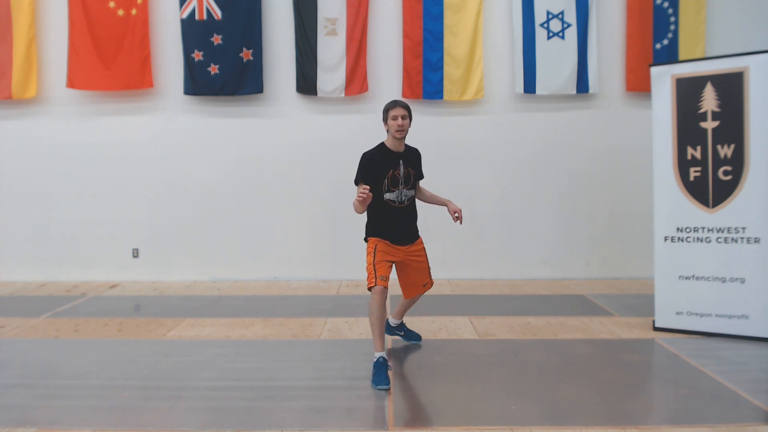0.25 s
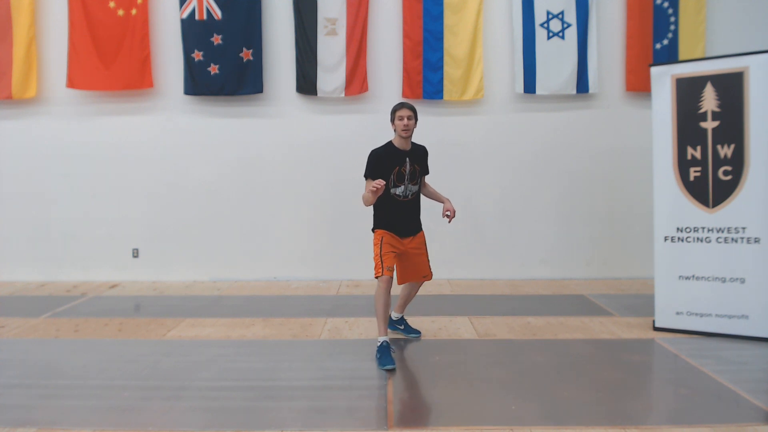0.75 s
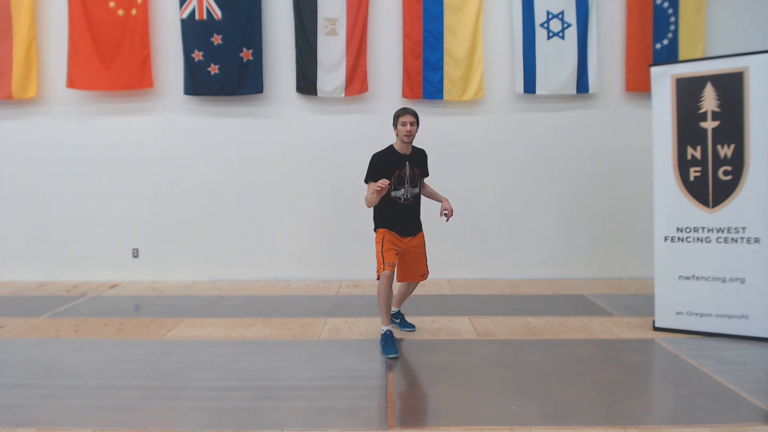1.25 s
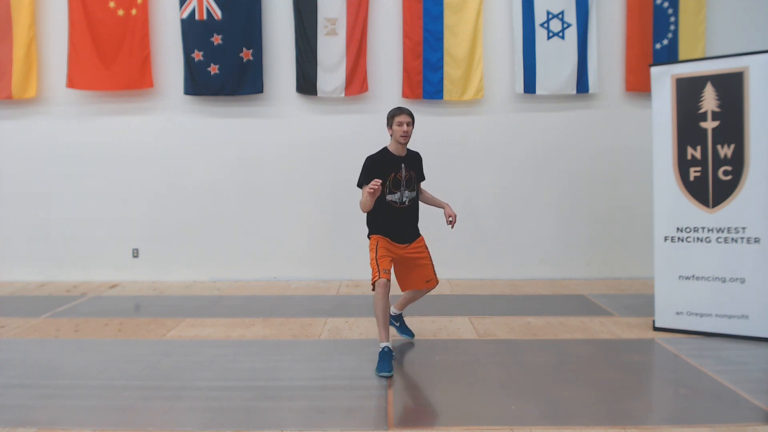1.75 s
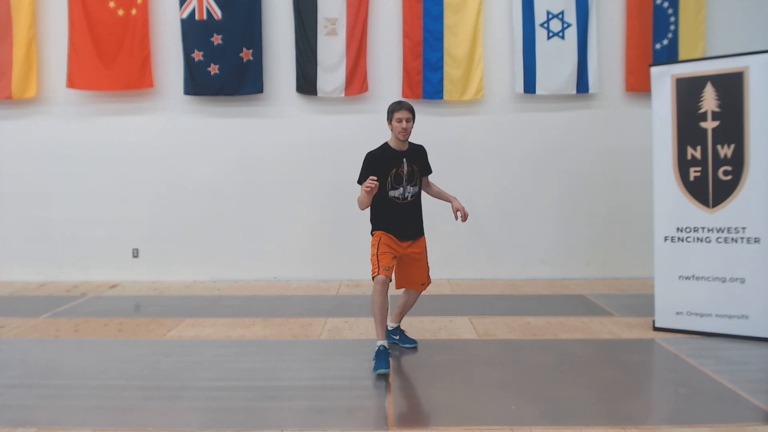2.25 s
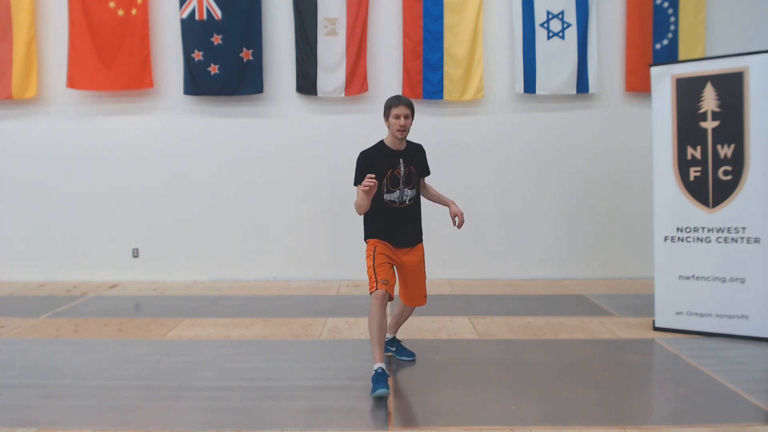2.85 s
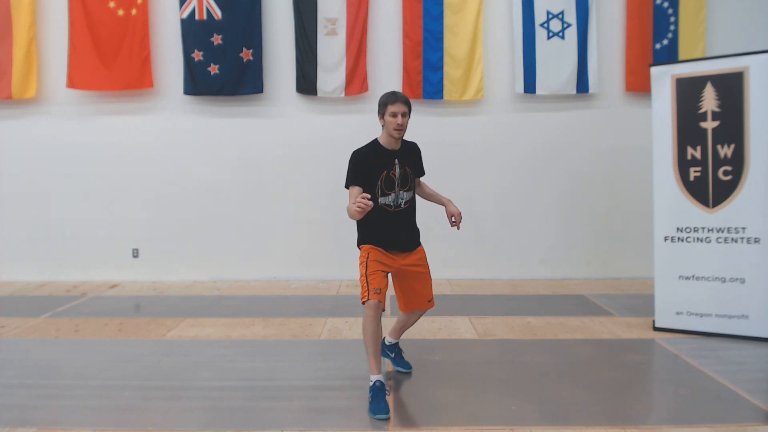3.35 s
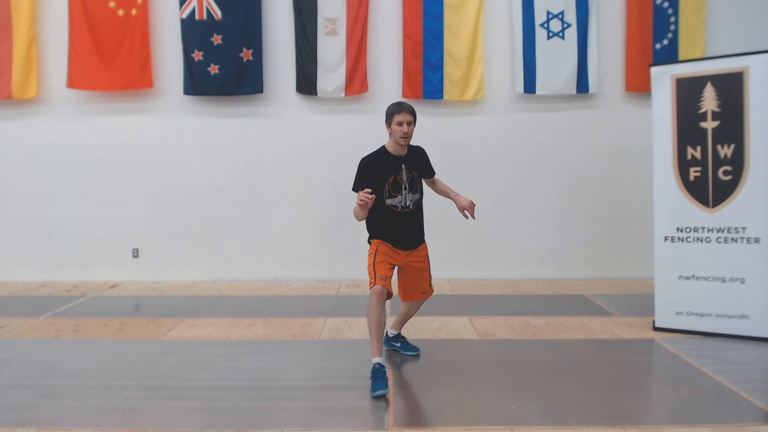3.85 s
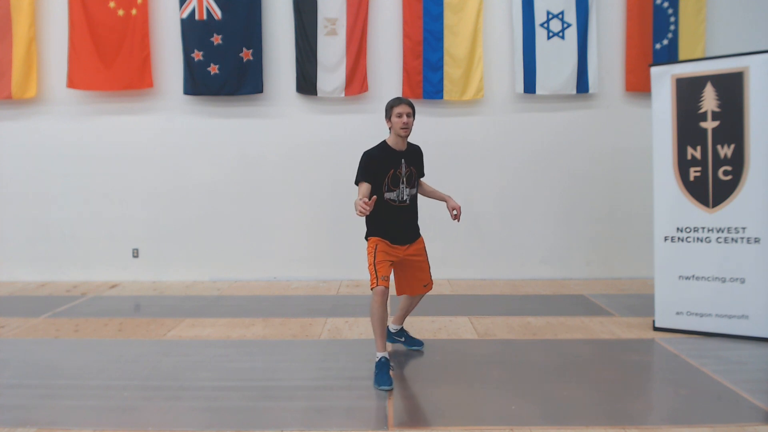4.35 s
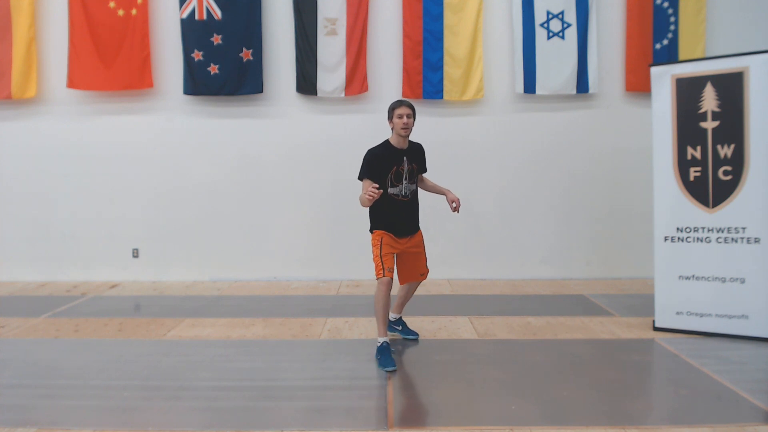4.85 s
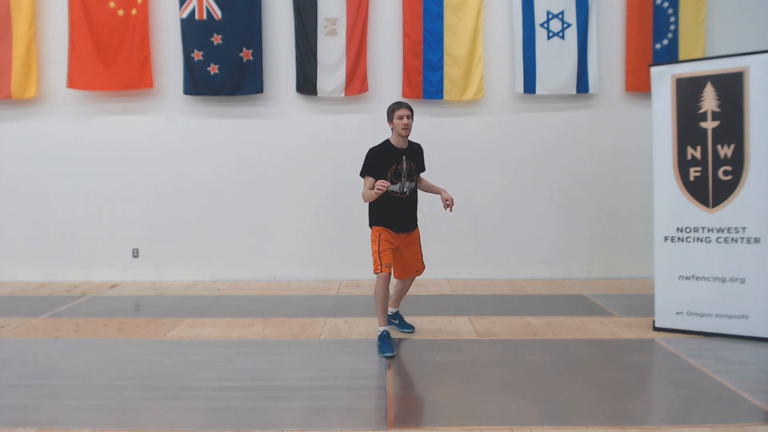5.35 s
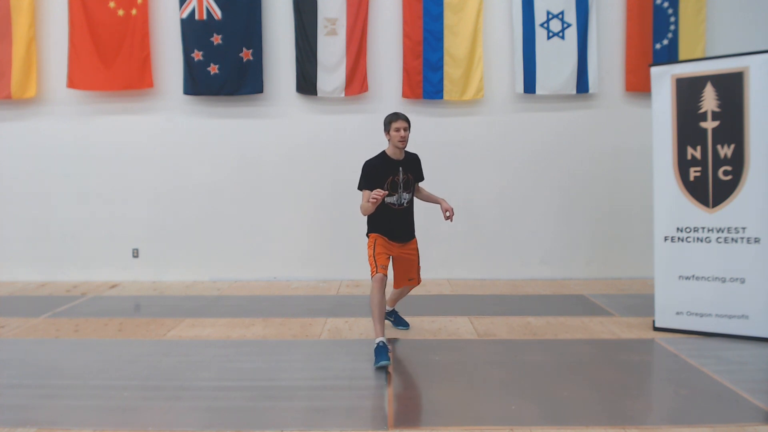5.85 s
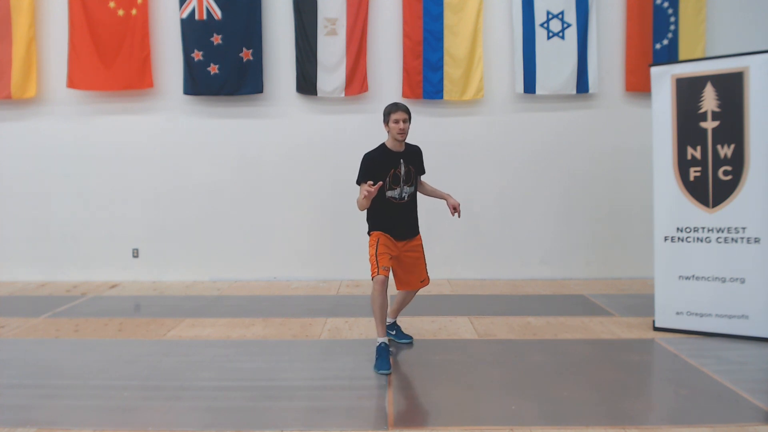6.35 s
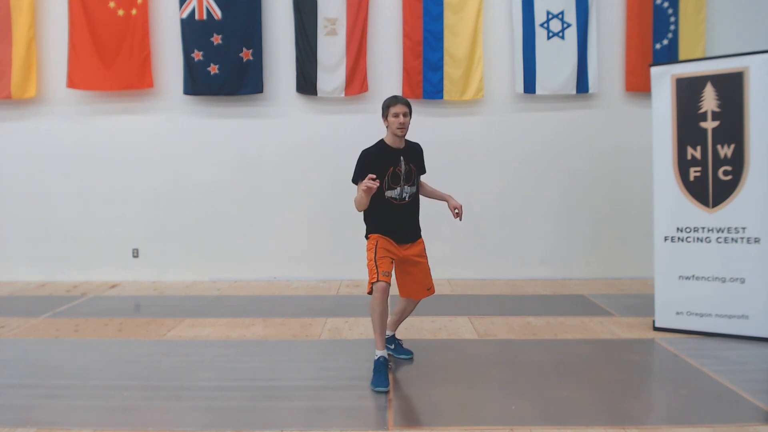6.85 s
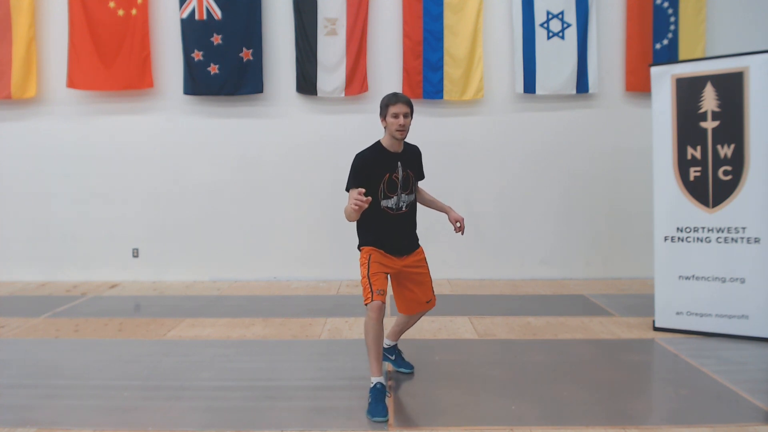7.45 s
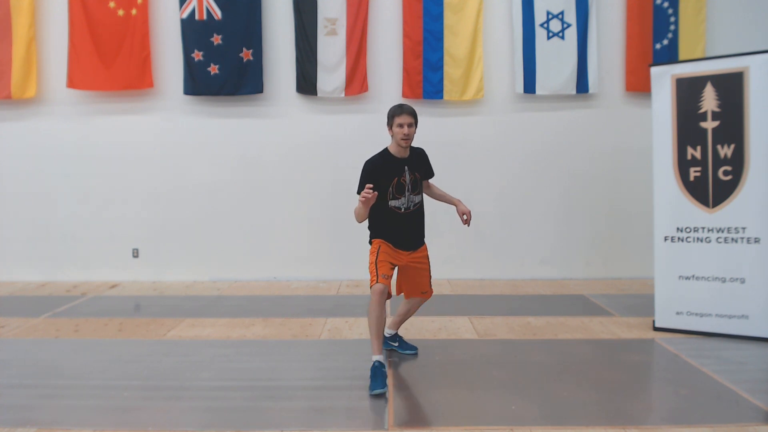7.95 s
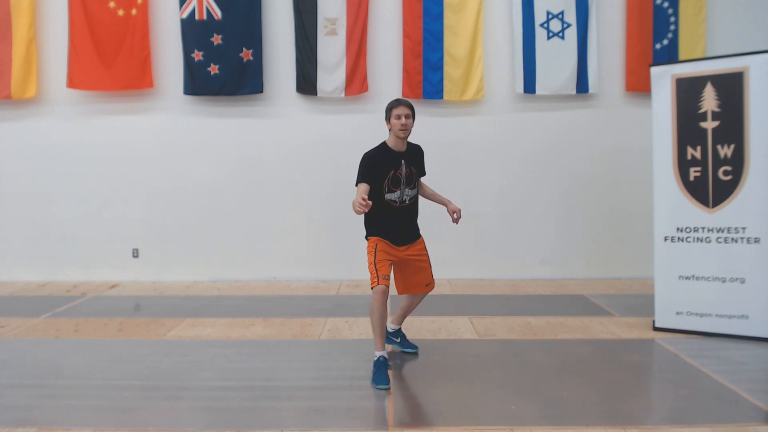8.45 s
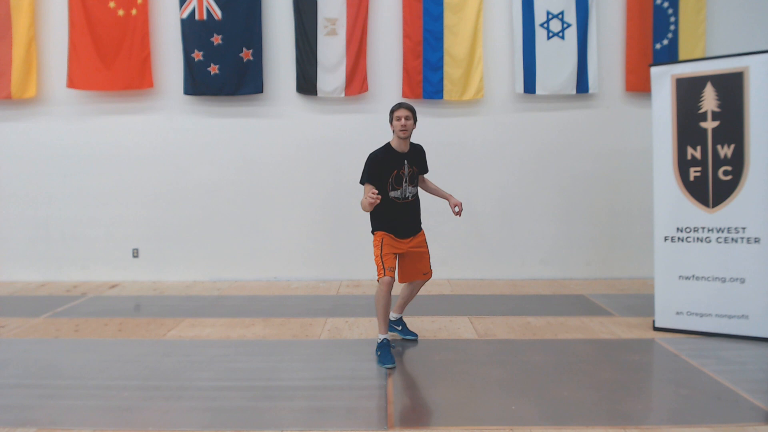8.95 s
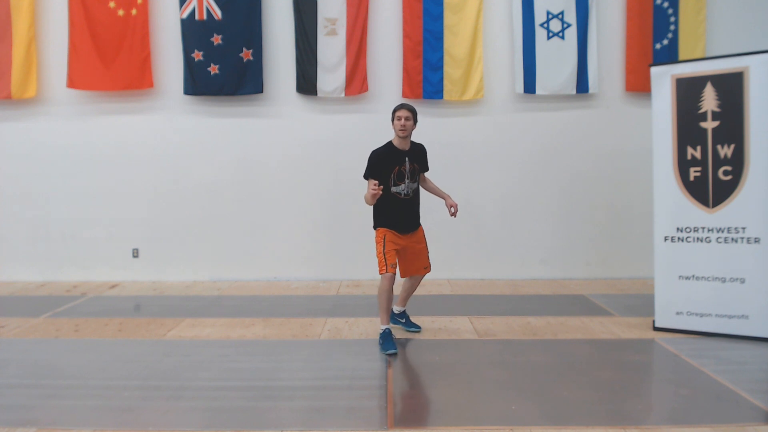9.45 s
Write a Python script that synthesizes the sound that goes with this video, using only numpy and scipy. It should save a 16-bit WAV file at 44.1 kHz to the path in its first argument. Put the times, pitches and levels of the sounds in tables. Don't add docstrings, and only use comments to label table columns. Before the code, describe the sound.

One person's sneakers move quickly back and forth on a boarded floor in an echoing hall, a few metres from the microphone. Soft heel thuds, flat slaps and gritty scuffs come in irregular clusters. Sharp rubber squeaks sound around four to five seconds and again at seven and eight. Low traffic rumble and a distant engine hum stay underneath.

```python
import sys
import numpy as np
from scipy import signal
from scipy.fft import rfft, irfft, next_fast_len
from scipy.io import wavfile
from scipy.ndimage import uniform_filter1d

SR = 44100
rng = np.random.default_rng(int(sys.argv[2]) if len(sys.argv) > 2 else 0)


def wav_record(signal):
    frames = np.transpose(np.atleast_2d(signal))
    bounded = np.clip(frames, -1, 1)
    quanta = np.round(bounded * 32767).astype(np.int16)
    wavfile.write(sys.argv[1], SR, quanta)


def undo_db(level):
    steps = np.asarray(level, float) / 20
    return 10 ** steps


N = 427769
LEAD = SR // 4

# frequency_hz, density_db (per Hz)
VENTILATION = [(59, -11.5), (100, 1), (266, -18.5), (558, -23), (1310, -22), (1720, -37), (2930, -33),
               (3400, -46.5), (4110, -34), (4570, -45), (6020, -40), (8460, -48), (10500, -52),
               (14400, -47.5), (16000, -68.5)]
VENTILATION_DB = -49.5
# frequency_hz, density_db (per Hz)
TRAFFIC_SPECTRUM = [(12, -3.5), (22, 14), (40, 13.5), (70, 5.5), (120, -6), (220, -31.5)]
TRAFFIC_DB = -36
PASS_S, PASS_WIDTH_S, PASS_DB = 7.3, 0.96, 6
# time_s, firing_hz, level_db
TRUCK_ENGINE = [(0.0, 33.58, -41.5), (0.94, 33.57, -36), (1.78, 33.93, -31), (2.11, 46.9, -26),
                (2.19, 49.66, -38), (2.46, 61.34, -25), (2.73, 60.52, -35), (3.16, 59.14, -24),
                (3.83, 66.06, -31.5), (4.51, 60.9, -31.5), (5.46, 67.28, -32), (7.24, 72.14, -37),
                (7.97, 80.55, -50), (8.05, 86.5, -43), (8.16, 81.95, -37.5), (8.37, 89.1, -48.5),
                (9.43, 83.6, -41.5), (9.7, 86.5, -42)]
# time_s, firing_hz, level_db
CAR_ENGINE = [
    (4.3, 83.5, -48),
    (4.7, 90, -45),
    (5.1, 86.3, -52),
    (5.45, 88.5, -41),
    (6.5, 87.2, -46.5),
    (6.9, 86.8, -57.5),
]

# centre_hz, t60_s, level_db
REVERBERATION = [(147, .9, -5), (500, 1.0, 0), (1510, 4.4, -12.5), (4000, 1.1, -5.5), (8000, 0.51, -11),
                 (13100, .45, -13)]
# delay_s, level_db
REFLECTIONS = [
    (0.0144, -2.5),
    (0.0284, -11),
    (.054, -11),
]
EARLY_T60_S, EARLY_DB = 0.28, -7
# frequency_hz, gain_db
CASE_RESPONSE = [(2900, 1), (3400, -3.5), (3700, -1), (9300, -1), (10500, -5.5), (11800, 1.5), (15700, -5),
                 (16100, -52.5)]

# start_s, level_db, top_db (under level), length_s
SLIDING_SOLES = [(0.5145, -31.5, 2, 0.08), (0.951, -36.5, 0.5, 0.095), (1.174, -40, -1.5, 0.069),
                 (1.485, -45, -1, 0.048), (1.845, -33, -8.5, 0.037), (2.639, -26.5, -16, 0.016),
                 (3.083, -29, -13, 0.027), (3.274, -31, -11, 0.031), (6.073, -36, -5.5, 0.032),
                 (6.7894, -31, -7.5, 0.038), (6.943, -31, -7, 0.036), (7.186, -26, -10, 0.036),
                 (8.012, -34.5, 8, 0.039), (8.8794, -25.5, 0, 0.055), (9.212, -37, -11, 0.076),
                 (9.33, -31.5, 0, 0.097), (9.565, -42.5, 2, 0.06), (3.915, -35, 5, 0.069),
                 (4.747, -31.5, -6, .033), (5.203, -38.5, -1, 0.038), (0.413, -38, -9, 0.033),
                 (4.951, -37.5, -5.5, 0.041), (5.418, -44, -2, 0.11), (5.1, -45, -10, .03)]
# start_s, level_db, top_db (under level)
TREAD_TOUCHES = [(.1215, -33.5, -16), (0.2866, -36, -17), (.3242, -37, -10), (0.6835, -34, -16),
                 (.839, -45.5, -7), (1.306, -33, -18.5), (2.1395, -46.5, -19), (2.383, -35, -8),
                 (2.69, -38, -16), (2.8433, -33.5, -4), (3.391, -36.5, -15), (3.6944, -38, -15),
                 (3.784, -39.5, -6), (4.316, -41, -16), (4.4968, -39, -4), (4.65, -45.5, -7),
                 (7.8245, -47, -8), (5.5513, -32.5, -11), (5.7384, -42.5, -1), (6.3856, -41.5, -18),
                 (6.534, -44, -13), (6.839, -36, -14), (7.4918, -32, -10), (7.5204, -40, -3.5),
                 (7.869, -32, -13), (8.4731, -47.5, -12), (8.6852, -49, -10), (8.765, -36.5, -7),
                 (9.079, -47, 2)]
TOUCH_S = 0.017
# frequency_hz, density_db (per Hz)
FRICTION_SPECTRUM = [(1200, -27), (2000, -15.5), (2900, -7), (4200, -5), (5300, 0), (7000, 1.5), (8800, -2),
                     (13000, -16), (15500, -9)]

# start_s, thud_db, click_db (under thud)
HEEL_LANDINGS = [(0.283, -26.5, -11.5), (.695, -25.5, -13), (1.152, -27.5, -27), (1.83, -33.5, -31),
                 (2.631, -28, -10), (3.604, -33.5, -19), (4.494, -27.5, -35), (4.94, -31.5, -15),
                 (5.41, -36.5, -15), (6.707, -36.5, -24), (6.78, -31, -16.5), (7.175, -30, -20),
                 (8.529, -35.5, -19), (8.608, -34, -20), (9.026, -40, -19), (9.073, -30.5, -38),
                 (9.434, -35.5, -15), (9.556, -27, -25)]
# start_s, thud_db, slap_db (against thud)
FLAT_LANDINGS = [(0.681, -26.5, -1.5), (1.663, -36, -16), (2.38, -38.5, 4.5), (2.576, -30.5, 0),
                 (2.751, -36.5, -1), (2.838, -33, 4), (3.079, -29.5, -16), (3.27, -43.5, 2),
                 (6.529, -42.5, 1), (6.935, -31, 8.5), (7.07, -35, -7), (7.346, -36.5, 12.5),
                 (7.491, -37, 8.5), (7.707, -27.5, -7), (8.007, -36, -10), (8.87, -35, -5), (9.2, -43, 6)]
HEEL_SLAP_DB, FLAT_CLICK_DB, BOARD_HZ = -21, -19, 168.2

# start_s, length_s, slip_hz (mean), level_db, octave_db
RUBBER_SQUEAKS = [
    (-.15, 0.0238, 3882, -26.5, -11),
    (0.551, 0.0057, 4310, -25, -7.5),
    (3.278, .009, 3855, -37, -6),
    (3.94, 0.015, 4010, -11.5, -5),
    (4.773, 0.016, 4106, -8.5, -4.5),
    (5.237, 0.016, 4188, -10, -4),
    (7.342, 0.023, 3786, -12.5, -0.5),
    (8.038, 0.0171, 3864, -14.5, -7.5),
    (8.913, 0.0078, 4024, -27.5, -12),
]
# multiple, level_db (under the octave)
UPPER_HARMONICS = [(3, -18), (4, -35.5)]
SAG, SCOOP, WAVER = 0.079, 0.02, 0.009
FIRMEST = 0.39
STEADY_HZ, RAGGED_HZ, RAGGED_DB = 3880, 4130, 9
CHATTER_DB = -16.5
UPWARD_DB = 0.74


def level(x, db):
    return x * undo_db(db) / np.sqrt(np.mean(x ** 2))


def colour(x, points):
    size = next_fast_len(len(x) + 4096)
    hz, db = np.transpose(points)
    log_f = np.log(np.arange(size // 2 + 1) * SR / size + 1)
    gain = undo_db(np.interp(log_f, np.log(hz), db))
    return irfft(rfft(x, size) * gain, size)[:len(x)]


def band(x, lo_hz, hi_hz):
    return signal.sosfilt(signal.butter(2, [lo_hz, hi_hz], "band", fs=SR, output="sos"), x)


def walk(rate, size=N):
    hold = int(SR / rate)
    steps = np.repeat(rng.standard_normal(size // hold + 1), hold)
    return 2.58 * uniform_filter1d(uniform_filter1d(steps, hold), hold)[:size]


def curve(table):
    s, *columns = np.transpose(table)
    return [np.interp(np.arange(N) / SR, s, c) for c in columns]


def add(track, s, sound):
    part = track[LEAD + int(s * SR):][:len(sound)]
    part += sound[:len(part)]


def ventilation():
    air = colour(rng.standard_normal(N), VENTILATION + [(16500, -74.0)])
    return level(air, VENTILATION_DB + 3) * undo_db(0.67 * walk(2.0))


def traffic():
    t = np.arange(N) / SR
    swell = undo_db(1.5 * walk(3))
    rumble = level(colour(rng.standard_normal(N), TRAFFIC_SPECTRUM + [(400, -120)]), 0)
    passing = np.exp(-((t - PASS_S) / PASS_WIDTH_S) ** 2)
    return rumble * swell * undo_db(TRAFFIC_DB + PASS_DB * passing)


def engine(table, second_db=-22):
    hz, db = curve(table)
    t = np.arange(N) / SR
    rise, fall = t - table[0][0] + 0.41, table[-1][0] + 0.22 - t
    fade = np.clip(np.minimum(rise, fall) / 0.13, 0, 1)
    phase = 2 * np.pi * np.cumsum(hz * (1 + 0.0066 * walk(6.1))) / SR
    tone = np.sin(phase) + undo_db(second_db) * np.sin(2 * phase)
    return fade * undo_db(db + 1 + 0.87 * walk(5.7)) * tone


def background():
    return ventilation() + traffic() + engine(TRUCK_ENGINE) + engine(CAR_ENGINE, second_db=-59)


def hall(x):
    t = np.arange(int(1.6 * SR)) / SR
    reply = np.zeros(len(t))
    between = [np.sqrt(a[0] * b[0]) for a, b in zip(REVERBERATION, REVERBERATION[1:])]
    edges = [60.] + between + [18000.]
    for (hz, t60, db), lo, hi in zip(REVERBERATION, edges, edges[1:]):
        fade = np.exp(-np.log(1000) * t / t60) * np.clip((t - 0.006) / 0.0028, 0, 1)
        tail = band(rng.standard_normal(len(t)), lo, hi) * fade
        reply += undo_db(db) * tail / np.sqrt(np.sum(fade ** 2))

    fade = np.exp(-np.log(1000) * t / EARLY_T60_S) * np.clip((t - 0.004) / 0.006, 0, 1)
    early = band(rng.standard_normal(len(t)), 2500, 14000) * fade
    reply += undo_db(EARLY_DB) * early / np.sqrt(np.sum(fade ** 2))

    for s, db in REFLECTIONS:
        scatter = 0.11 * rng.standard_normal(200) * np.exp(-t[:200] / 0.002)
        scatter[0] += 1
        reply[int(s * SR):][:200] += undo_db(db) * band(scatter, 130, 11000)
    return signal.fftconvolve(x, reply)[:len(x)]


def scuffs():
    body, top = np.zeros((2, N + LEAD))
    touches = [(*row, TOUCH_S) for row in TREAD_TOUCHES]
    for s, db, top_db, length in SLIDING_SOLES + touches:
        u = np.linspace(0, 1, int(np.clip(length, 0.004, 0.12) * SR))
        onset = np.clip(u * length / 0.0015, 0, 1)
        pressure = (1 - u ** 3) * (0.5 + 0.76 * np.sin(np.pi * u))
        drag = undo_db(db - 14) * onset * pressure
        add(body, s - 0.21 * length, drag)
        add(top, s - 0.1 * length, drag * undo_db(top_db - 0.5))
    grain = undo_db(2 * walk(400, size=len(body)))
    hiss = colour(rng.standard_normal(len(body)) * grain, FRICTION_SPECTRUM)
    high = colour(hiss, [(10000, -60), (10800, 0)])
    return body * level(hiss - high, 0) + top * level(high, 0)


def taps():
    out, t = np.zeros(N + LEAD), np.arange(2600) / SR
    landings = [(s, db, HEEL_SLAP_DB, click_db) for s, db, click_db in HEEL_LANDINGS]
    landings += [(*row, FLAT_CLICK_DB) for row in FLAT_LANDINGS]
    board_tone = 0.12 * np.sin(2 * np.pi * BOARD_HZ * t)
    for s, db, slap_db, click_db in landings:
        low, mid, high, top = rng.standard_normal((4, len(t)))
        boom = undo_db(9.5) * band((low + board_tone) * np.exp(-t / 0.01), 110, 400)
        knock = undo_db(2.5 + 0.1 * slap_db) * band(mid * np.exp(-t / 0.0065), 490, 1200)
        slap = undo_db(slap_db) * band(high * np.exp(-t / 0.003), 1700, 4500)
        click = undo_db(click_db + 8.0) * band(top * np.exp(-t / 0.00076), 3600, 9200)
        add(out, s + 0.002, undo_db(db) * (boom + knock + slap + click))
    return out


def squeaks():
    near, room = np.zeros((2, N + LEAD))
    for s, length, hz, db, octave_db in RUBBER_SQUEAKS:
        u = np.linspace(0, 1, int(length * SR))
        waver, flutter, beat = (walk(rate, size=2000)[:len(u)] for rate in (900, 400, 600))
        grit = rng.standard_normal((2, 2000))[:, :len(u)]
        ragged = np.clip((hz - STEADY_HZ) / (RAGGED_HZ - STEADY_HZ), 0, 1)

        glide = SAG * (0.5 - u) + SCOOP * np.exp(-u / 0.041) + WAVER * waver
        rate = hz * (1 + (0.64 + 0.69 * ragged) * glide)
        phase = 2 * np.pi * np.cumsum(rate) / SR
        swell = 0.69 + 0.35 * np.exp(-((u - FIRMEST) / 0.54) ** 2)
        ends = np.clip(np.minimum(u / 0.14, (1 - u) / 0.32), 0, 1)
        grip = undo_db(db - 0.5 + 0.65 * flutter) * swell * ends

        low = np.sin(phase)
        upper = sum(undo_db(d) * np.sin(k * phase + 0.6 * beat) for k, d in UPPER_HARMONICS)
        over = np.sin(2 * phase + 0.45 * waver) + upper
        over = undo_db(octave_db + 1.5 * beat - 0.9 * u) * over

        chatter = band(band(grit[0], 2500, 12000), 2900, 8000)
        fringe = band(grit[1], 1.1 * hz, 1.334 * hz)
        fringe = undo_db(-4.0 + RAGGED_DB * ragged + 5.9 * u) * fringe
        rough = undo_db(CHATTER_DB + ragged) * (chatter + fringe)

        upward = undo_db(UPWARD_DB - 0.67 * octave_db) * low
        add(near, s, grip * (low + over + rough))
        add(room, s, grip * (upward + undo_db(-6.0) * over + undo_db(7) * rough))
    return near, room


def scene():
    near, room = squeaks()
    steps, slides = taps(), scuffs()
    echoes = hall(room + undo_db(-4.5) * steps + undo_db(-3.5) * slides)
    feet = colour(near + steps + slides + echoes, CASE_RESPONSE)
    return (feet[LEAD:] + background())[None]


def band_limit(x):
    return signal.sosfilt(signal.butter(12, 16480, fs=SR, output="sos"), x)


def record(dry):
    return band_limit(dry)


dry = scene()
out = record(dry)
wav_record(out)
```